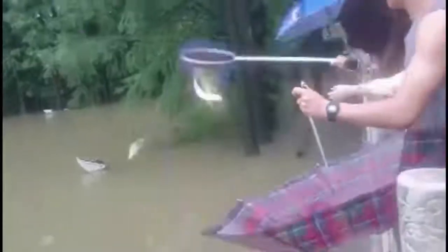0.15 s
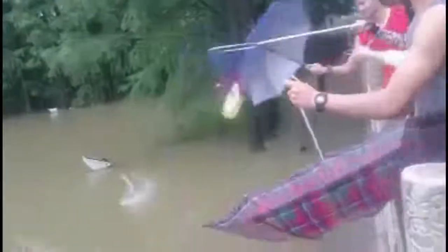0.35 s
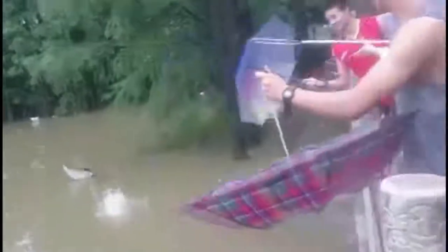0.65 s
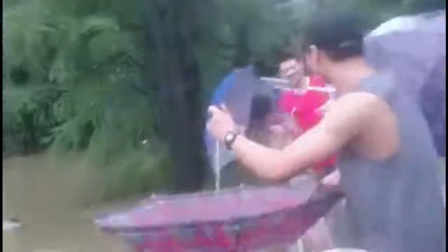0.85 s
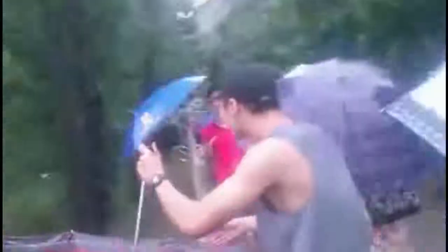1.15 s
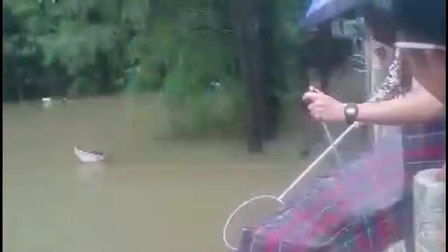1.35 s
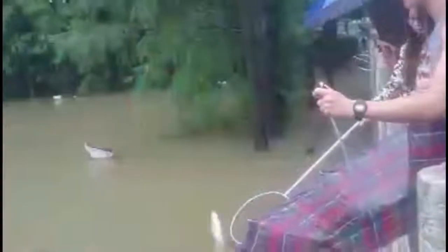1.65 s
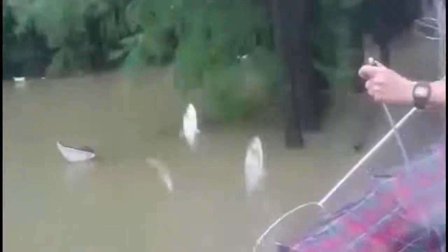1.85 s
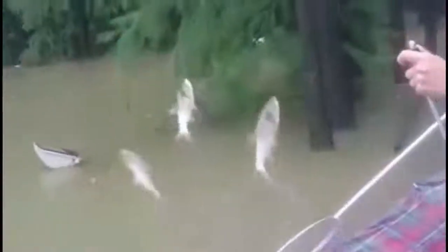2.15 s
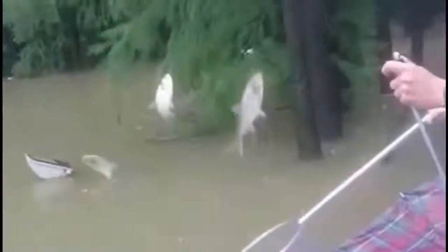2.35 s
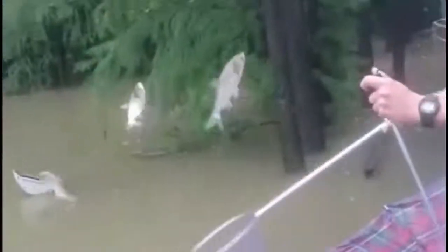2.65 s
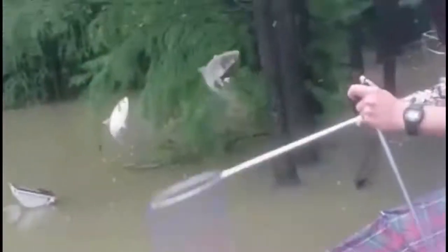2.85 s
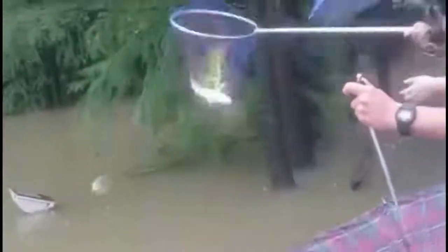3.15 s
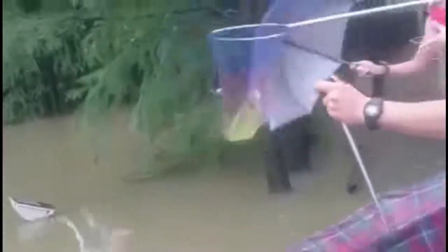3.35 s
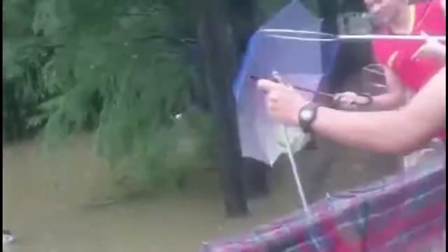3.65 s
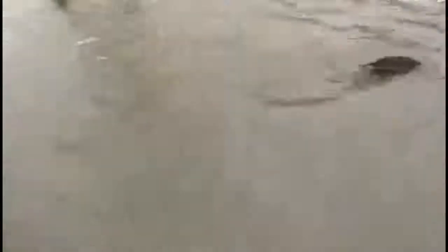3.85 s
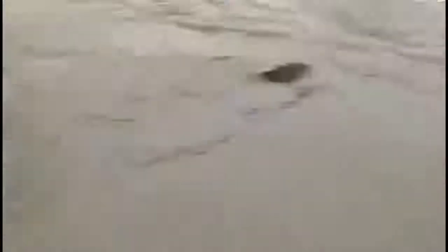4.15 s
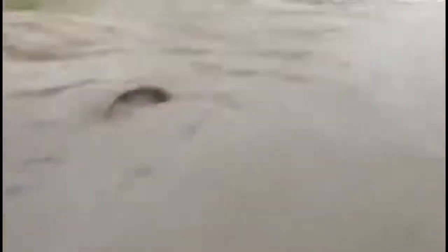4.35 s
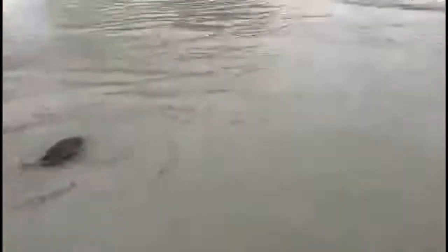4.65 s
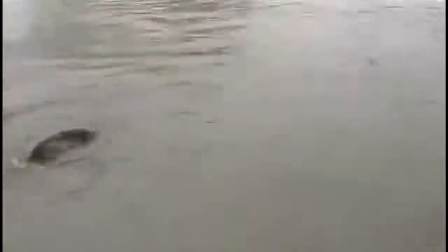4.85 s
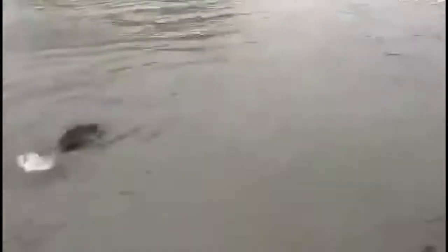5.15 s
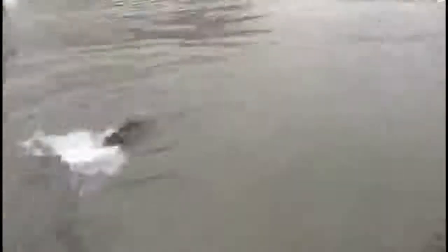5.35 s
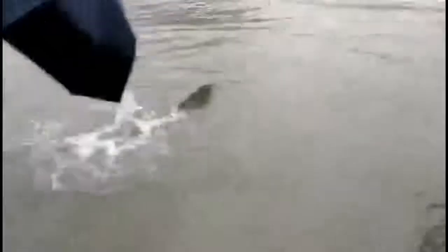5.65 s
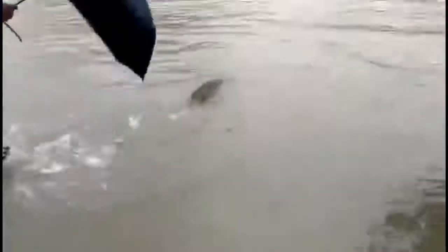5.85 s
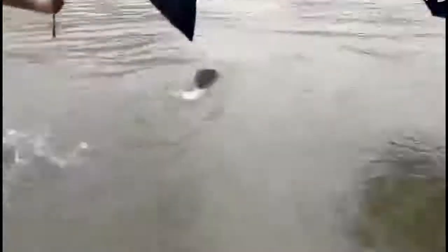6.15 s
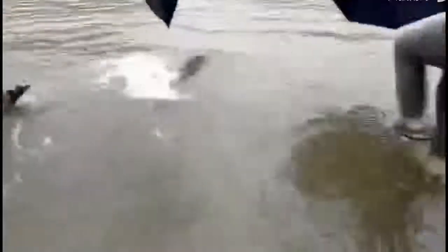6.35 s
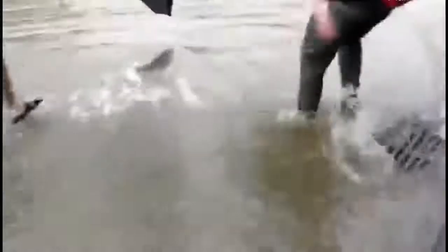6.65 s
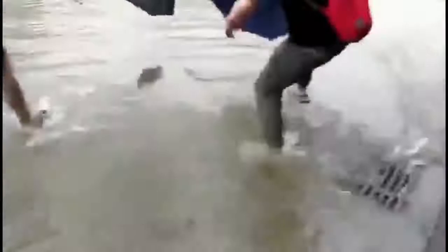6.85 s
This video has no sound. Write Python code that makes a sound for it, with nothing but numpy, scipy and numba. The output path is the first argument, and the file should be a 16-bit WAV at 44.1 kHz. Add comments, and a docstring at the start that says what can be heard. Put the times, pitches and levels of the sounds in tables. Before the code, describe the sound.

Rapid dripping and bubbling plops ring in an echoing hollow, joined after the midpoint by a growing rush of churning water.

```python
"""Drips ring out over a trickle in a hard-walled hollow: damped sines for bubbles, noise snaps for impacts.
Softer-starting bubbles hold or glide in pitch; short weak sines blur each ring into an echo tail.
Swarms of small sines form the trickle, and feedback delays the echo of the hollow.
A broad gush then swells in: flickering noise bands joined by dense bubble and droplet swarms.
Below it lie a rumble that follows the flow and a far, lumpy one; thin hiss and bright sprays lie above."""
import sys
import numpy as np
from scipy import signal
from scipy.fft import rfft, irfft, next_fast_len
from scipy.io import wavfile
from numba import njit

SR = 44100
rng = np.random.default_rng(int(sys.argv[2]) if len(sys.argv) > 2 else 0)


def output_pcm(signal):
    """Save a mono or channel-first signal as 16-bit PCM at the path in sys.argv[1].

    Samples are clipped to [-1, 1] before scaling.
    """
    pcm = np.clip(np.atleast_2d(signal).T, -1, 1) * 32767
    wavfile.write(sys.argv[1], SR, np.round(pcm).astype(np.int16))


N = 308259

# Columns named "left-right/dB" give the level at the left ear minus that at the right.
# Drop impacts: t/s, level/dB (before a common lift), left-right/dB
IMPACTS = [(0.07, -35, 1), (0.197, -27, 8), (0.235, -31, -5), (.5307, -35, 10), (.699, -34, 0),
           (0.767, -36, 4), (0.998, -26, -4), (1.055, -30, -5), (1.191, -34, -12), (1.277, -30, 10),
           (1.435, -30, 7), (1.453, -28, 7), (1.5708, -28, 4), (1.6336, -34, 2), (1.6584, -33, -4),
           (1.79, -32, 4), (1.8842, -29, -8), (1.944, -24, 8), (2.0057, -27, 0), (2.0513, -23.5, 3),
           (2.6157, -23, 8), (2.7464, -29.5, -8), (2.84, -23, 3), (3.2859, -32, 12), (3.49, -34.5, -2),
           (3.5545, -34, -12), (3.7994, -30, -3), (4.0126, -43, -1), (4.274, -22, 6), (4.398, -30.5, -9),
           (4.4353, -27, 8), (4.5704, -31, -16), (4.6253, -32, 14), (4.697, -32, 0), (4.757, -28, 7),
           (5.222, -29, -12), (5.3582, -25.5, 7), (5.723, -33, 2), (5.9638, -35, 5), (6.01, -27, 4),
           (6.385, -38, 0), (6.445, -42, 0), (6.563, -46, -6), (6.6087, -29, 5), (6.645, -41, -4),
           (6.6793, -33, 9), (6.85, -30, 1), (6.861, -32, -4), (6.875, -25, -5)]
# Small bubbles of the trickle: t/s, level/dB
TRICKLE_LEVEL = [(0, -46.5), (.4, -52.5), (.55, -45.5), (1.1, -52.5), (1.25, -43.5), (1.7, -49),
                 (2.0, -45.5), (2.4, -46), (2.68, -46.5), (2.9, -46), (3.05, -48), (3.8, -49), (4.4, -46.5)]
# Flow of the gush: t/s, level/dB
GUSH_FLOW = [(3.87, -46.5), (4.84, -44), (5.12, -46.5), (5.17, -41.5), (5.3, -45), (5.49, -40),
             (5.525, -36.5), (5.56, -40.5), (5.84, -39.5), (5.94, -38), (6.1, -38.5), (6.5, -40),
             (6.63, -36.5), (6.72, -39.5), (6.86, -39.5), (6.99, -40.5)]
# Relative spectral densities of the noises: f/Hz, level/dB (per Hz)
HISS_SPECTRUM = [(180, -64), (300, -20), (968, -9.5), (1890, 3), (2310, -13), (5070, -8), (9910, -21.5),
                 (13800, -18.5), (15300, -32), (16400, -51)]
RUSH_SPECTRUM = [(76, -53), (130, -17.5), (771, -2), (2160, -5), (2490, -1), (3740, -13), (8230, -25.5),
                 (12100, -42), (15100, -44), (16400, -55)]
RUMBLE_SPECTRUM = [(20, 6), (40, -31), (62, -1), (80, 14), (110, -25), (150, -52)]
FAR_RUMBLE_SPECTRUM = [(20, -4), (40, -12.5), (75, -0.5), (110, -9.5), (155, -15.5), (220, -21.5),
                       (300, -21)]
# Correlation between the ears: f/Hz, coefficient [0 to 1]
EAR_CORRELATION = [(60, 0.75), (130, 0.6), (300, 0.35), (500, 0.59), (1600, 0.56), (5000, 0.46),
                   (15000, 0.028)]
# Zero line of the waveform: t/s, offset [full scale = 1]
ZERO_LINE = [(0, .00475), (3.872, .00475), (3.877, .0089), (7, .0089)]
# Fine sprays falling back after a splash: t/s, level/dB, lowest f/Hz, decay time/ms
SPRAY_EVENTS = [(0.072, -47, 3000, 13), (0.531, -44.5, 3500, 23), (.2, -52, 6000, 15),
                (1.845, -58, 5500, 15), (2.048, -41, 9100, 18), (2.63, -46, 3500, 18),
                (3.288, -63, 5500, 11), (1.278, -44, 4000, 11), (1.66, -48, 4500, 18),
                (4.014, -54, 4300, 20), (4.757, -49, 5000, 28), (5.962, -35, 8000, 25)]
# Low pushes under the heaviest drops: t/s, level/dB, f/Hz, fade/ms
HEAVES = [(2.615, -52, 169, 22), (2.8391, -43, 260, 2.3)]
# Bubbles struck by a falling drop: t/s, level/dB, f/Hz, fade/ms, left-right/dB
STRUCK_BUBBLES = [(.0025, -28, 3600, 3.1, 8.5), (0.073, -19.5, 4070, 2.1, 7.5),
                  (0.1593, -21.5, 2020, 6.3, 3.5), (.2, -18, 8040, 1.1, -2), (.2155, -34, 3270, 2.2, -5),
                  (0.216, -28, 8100, 1.4, -0.5), (0.236, -21.5, 2410, 3, -16), (0.2991, -20, 4170, 5.7, -5),
                  (0.354, -31, 6000, 2, 1.5), (0.3605, -27, 3250, 2, -1.5), (0.4474, -22.5, 2570, 3.5, -17),
                  (0.611, -36.5, 6700, 2.5, 6), (0.6999, -19, 3020, 3.2, 16), (0.7008, -35, 4300, 1.1, 18),
                  (.81, -35, 3250, 1.7, 3), (0.8272, -28.5, 2500, 3.3, 17.5), (0.9351, -28, 2060, 1.3, -13),
                  (0.933, -28, 4140, 1.8, -6.5), (0.9994, -27, 1980, 4.3, 19.5),
                  (1.017, -37, 2690, 5.3, 5.5), (1.0427, -30, 2030, 12, 7), (1.057, -21.5, 5700, 1.8, -11),
                  (1.128, -40, 4430, 9, 3), (1.1905, -30.5, 2700, 3.8, -13.5), (1.219, -33, 2720, 9.7, 16),
                  (1.2775, -17.5, 4700, 2, -3), (1.28, -24.5, 3750, 2.8, -2), (1.278, -24.5, 5460, 2.8, -1),
                  (1.4186, -36, 1000, 10, 6), (1.4345, -37, 1002, 21, 0), (1.453, -23, 2900, 1.9, 0),
                  (1.4608, -32, 7500, 1.7, 1.5), (1.467, -35, 1616, 14.5, 26),
                  (1.477, -28.5, 2000, 7.1, -9), (1.486, -23, 3880, 2.4, 10.5),
                  (1.5725, -33, 6430, 1.4, 0.5), (1.589, -31, 2410, 7.1, -3), (1.641, -38, 1580, 9, -4),
                  (1.6585, -24.5, 2940, 3.8, 7), (1.6614, -18, 5600, 2.3, 12.5), (1.76, -45, 6740, 1.3, -4),
                  (1.818, -30, 2080, 4.7, 5), (1.832, -24.5, 3400, 1.8, 1), (1.831, -30, 4430, 1.2, 11),
                  (1.8442, -35, 2000, 6.1, -3), (1.886, -22, 2200, 2, -16.5),
                  (1.9229, -28.5, 4320, 2.2, 10), (1.95, -41, 7000, 3.6, 7.5), (1.996, -29, 4270, 1.4, 3),
                  (2.024, -22, 1810, 2.8, 10), (2.128, -28.5, 3050, 0.71, 1.5), (2.11, -38, 5540, 5.5, 2),
                  (2.1776, -25, 3600, 1.2, 10), (2.217, -27, 1750, 5.7, 5), (2.265, -31, 7100, 0.85, 2),
                  (2.281, -34, 2220, 4.2, -2), (2.309, -18.5, 3050, 1.9, 8), (2.432, -19, 1860, 5.8, 10.5),
                  (2.472, -49, 2550, 7.3, -4), (2.5462, -34, 5100, 2.6, 8), (2.604, -25, 2070, 6.9, 7),
                  (2.618, -17.5, 5800, 0.56, -3), (2.6176, -17.5, 2870, 4.2, -6.5),
                  (2.625, -24, 3630, 6, 7.5), (2.6375, -29, 6260, 1.7, -4.5), (2.726, -29.5, 1960, 6.1, -6),
                  (2.749, -18.5, 3500, 2.1, -13), (2.7487, -28, 4300, 1.8, -8), (2.842, -12, 1894, 4.2, -3),
                  (2.843, -25, 5140, 1, -12), (2.882, -36, 3400, 2, -18), (2.899, -23.5, 1870, 6.4, -9),
                  (3.028, -30.5, 2100, 4.4, 6), (3.167, -31, 1970, 4.4, -6), (3.18, -31.5, 2680, 1.2, 3),
                  (3.286, -28.5, 2850, 1.8, -1), (3.286, -22, 7160, 0.97, 1), (3.342, -24.5, 4670, 2.1, 3),
                  (3.3467, -28.5, 2420, 4.2, 3.5), (3.489, -36, 3550, 2.4, 1),
                  (3.5546, -26, 4800, 3.7, -11), (3.611, -34, 1630, 8.9, 5),
                  (3.6488, -18.5, 1690, 6.4, 9.5), (3.664, -20.5, 3370, 1.2, -4),
                  (3.6656, -29, 4400, 1.2, 8), (3.68, -33, 3020, 5.6, 12), (3.693, -37.5, 2920, 4.6, 33),
                  (3.776, -29, 6200, 3, 1), (3.7766, -27.5, 3020, 1.9, 12), (3.7755, -32, 5230, 1.5, 9),
                  (3.849, -34, 3530, 2.6, 1), (3.913, -36, 4070, 5.1, 14), (4.012, -13.5, 4970, 1.6, 9.5),
                  (4.0132, -20.5, 5760, 1.8, 8.5), (4.0168, -22, 1365, 4.7, 5),
                  (4.153, -23, 4320, 1.6, 3.5), (4.176, -22, 5000, 1.5, 7), (4.1765, -37, 5940, 1.5, 18),
                  (4.194, -33, 2930, 3.5, 11), (4.2758, -22.5, 1720, 5.4, -2), (4.285, -33, 3900, 3.6, 10),
                  (4.304, -29, 2570, 2.1, -2), (4.3974, -15, 2250, 2.4, -7.5), (4.428, -21, 2660, 5.6, 10),
                  (4.4465, -44, 9200, 1.5, 16), (4.571, -37, 2320, 3.6, -17), (4.627, -21.5, 7000, 0.65, 8),
                  (4.757, -25, 3080, 2, 1.5), (4.765, -24, 7300, 1.6, -3), (4.833, -27, 2650, 5.2, 1.5),
                  (4.866, -29.5, 1240, 3.4, 3.5), (4.9464, -20, 2700, 2.3, -7),
                  (4.995, -24.5, 2160, 4.7, 3), (5.031, -27.5, 1420, 4.9, 6), (5.192, -24.5, 934, 2.4, 3),
                  (5.2235, -20, 3820, 2.4, -14), (5.2232, -29, 4460, 1.8, -16), (5.279, -25, 4260, 2.5, 1),
                  (5.36, -15.5, 1780, 6, -4), (5.382, -26, 7530, 4.7, 7), (5.415, -28, 3540, 2.6, 16),
                  (5.516, -29.5, 3790, 3, -11), (5.6145, -26.5, 1620, 7.9, 8), (5.725, -21, 4000, 1.8, 6),
                  (5.726, -31, 735, 5.7, 9), (5.754, -26, 2550, 7.9, -2.5), (5.896, -21, 3290, 1.9, -12),
                  (5.918, -24, 4900, 1.2, -5), (6.0074, -17, 4030, 1.4, -11.5),
                  (6.0082, -22, 5000, 1.7, -3), (6.1173, -13, 2200, 5.8, -3), (6.15, -24, 1980, 2.7, 3),
                  (6.192, -23.5, 5700, 3, -3), (6.1983, -24.5, 900, 4.6, 8), (6.252, -20, 3960, 2.2, -2.5),
                  (6.2517, -21, 2210, 1.9, -18), (6.287, -31, 3670, 4.3, 11), (6.317, -31, 4520, 4.2, 8.5),
                  (6.317, -19.5, 3600, 1.9, 3.5), (6.379, -18.5, 2730, 5.1, -5),
                  (6.611, -23.5, 3010, 3.3, 18), (6.645, -20, 3930, 1.9, 11),
                  (6.6787, -30.5, 7400, 2.7, 8.5), (6.72, -34, 7700, 1.7, 2), (6.7865, -23, 890, 1.2, 9),
                  (6.846, -20, 1156, 1.5, 5), (6.845, -18.5, 2800, 1.8, -5), (6.846, -22, 3870, 1.7, -4),
                  (6.848, -21, 5240, 1.4, 5), (6.873, -27, 4120, 2.1, 13), (6.875, -28, 770, 4.7, 11),
                  (6.9262, -20.5, 2140, 6.6, 2.5)]
# Softer-starting bubbles, steady or gliding in pitch:
# t/s, level/dB, f/Hz, glide/(octaves per s), fade/ms, left-right/dB
SOFT_BUBBLES = [(0.012, -34, 1620, 5, 12, 4), (.053, -38.5, 1930, 2.5, 11, -18),
                (0.0734, -27, 1810, 1, 2.3, -4), (0.169, -36, 2150, 29, 19, 1.5),
                (0.202, -31.5, 1427, 26, 16, 6), (0.258, -37.5, 995, -2.5, 25, -6),
                (.379, -38, 2140, 0, 10, -2), (0.414, -34.5, 2420, 3, 40, 6.5),
                (.454, -38, 1115, 17, 11, 8), (0.536, -33.5, 2480, 46, 7.4, 14.5),
                (.547, -38.5, 1296, 4, 38, 4), (.598, -36, 1546, 24.5, 14, 13.5),
                (0.704, -33.5, 1330, 35, 7.6, -2), (0.7496, -20, 1543, 47, 8.6, 4.5),
                (0.861, -46, 1110, -2.5, 19, -3), (0.8998, -33, 1394, 11.5, 24, 4.5),
                (1.0, -32, 1890, 40, 11.9, 16), (1.162, -37, 1400, -8, 6.9, 0),
                (1.177, -33, 870, 45, 22, 7), (1.2035, -29, 1690, 0, 8, 5), (1.252, -35, 1236, 23, 16, 6),
                (1.267, -36, 1790, 0.5, 41, 3), (1.336, -33.5, 916, 64, 18, 4),
                (1.59, -36, 881, -0.5, 22, -9), (1.6337, -18, 1513, 77.5, 10.2, -3),
                (1.827, -22, 1520, 31, 9.3, -5), (1.874, -37, 1047, 7, 11, -8),
                (1.956, -24.5, 1546, 25.5, 17, 4), (2.0092, -28, 933, -1, 8.7, 6),
                (2.043, -33, 1680, -1, 26, -7), (2.129, -40, 1250, 0.5, 12, 8),
                (2.152, -36, 2880, 2, 18, -3), (2.3134, -31.5, 913, -1.5, 19, -6),
                (2.346, -37, 980, 10, 12, 1), (2.362, -28.5, 1415, -6, 4, 4),
                (2.398, -42.5, 898, 0, 33, 14), (2.5093, -30.5, 1295, 36, 17, -9),
                (2.545, -36, 996, 45, 29, 4), (2.57, -38, 1200, 29, 17, 7),
                (2.707, -43.5, 1000, 8.5, 45, -13), (2.774, -32.5, 1320, 15.5, 22, -5),
                (2.8132, -28, 1610, 30, 7.2, -6), (2.846, -21, 1330, 51, 6.6, -4),
                (3.003, -39, 1730, 2.5, 25, 5), (3.031, -44, 990, -1, 12, 14),
                (3.073, -25, 1466, 41, 11, -3), (3.169, -37.5, 1110, 33, 21, 4),
                (3.1903, -37, 1186, 3.5, 11, 2), (3.447, -30.5, 1670, -1, 7.1, -11),
                (3.4906, -40, 911, -1.5, 47, 10), (3.5265, -43.5, 927, -0.5, 27, 4),
                (3.5902, -24.5, 1405, 44, 8.2, -7.5), (3.624, -33.5, 1740, 10, 21, 3),
                (3.6388, -31, 857, 14, 6.8, 6), (3.743, -38, 3300, 54, 6.1, 10),
                (3.76, -51, 1116, 2, 41, 2), (3.786, -35.5, 1250, 70, 21, 2.5),
                (3.846, -42.5, 1144, 0.5, 38, -3), (3.872, -35.5, 973, 42, 22.6, 6),
                (3.995, -44, 820, 25, 17, 5), (4.112, -34, 1410, 2, 11, -7),
                (4.2252, -36.5, 892, 31, 35, 4), (4.429, -29, 1270, 33, 8.1, 5),
                (4.525, -33, 1690, 4.5, 22, 4), (4.736, -30, 1240, 17, 8.4, 8),
                (5.207, -27.5, 1393, 40, 18, 6.5), (5.518, -23, 730, 6, 3, 7),
                (5.521, -28.5, 1202, 0.5, 14, 0), (5.529, -24, 1710, -27, 5.2, 5),
                (5.576, -18, 1255, 85, 10.2, -3), (5.928, -14, 446, 31, 5.5, -3),
                (6.014, -29.5, 1670, 47, 3.7, 22.5), (6.109, -28, 1500, 53, 2.3, 15),
                (6.122, -21, 1360, 19.5, 16.6, -5), (6.58, -32.5, 1290, 14, 70, 5),
                (6.632, -25, 980, 0, 2.1, 1), (6.6439, -21, 960, -8, 2.3, 9),
                (6.785, -30, 1262, 25.5, 32, 6)]

HISS_DB, FAR_RUMBLE_DB = -49.5, -70.5
LUMP_DB, LUMP_SPLIT_HZ = 14, 95   # depth of the far rumble's lumps, which lie above the split
RUMBLE_DB, RUMBLE_FOLLOWS = -54, 0.92   # level at the final flow; dB per dB of flow
SURGE_DB, SURGES_PER_S, GUSH_CLUMP_DB = 1.2, 20, 1.5   # quick clumps in the gush; in its two swarms
GUSH_START_S, GUSH_OPENING_S = 3.87, 1.23
SHARED_FLICKER = .2   # weight of the flicker common to all noise bands
WAVER, FLUTTER = .013, 22.   # share of pitch; the level wavers this many times as much
CLEAR_ROUGH = 1.7   # clear bubbles waver this many times more
TICK_S, TICK_LIFT_DB, TICK_BAND_HZ = .0006, 3.5, [1810, 10400]
SMALL_CLUMP_DB, SMALL_CLUMPS_PER_S = 3.5, 12.3
TINY_DB, TINY_CLUMP_DB, TINY_CLUMPS_PER_S = -49, 2.5, 8.3
STRUCK_SWELL_MS, STRUCK_GLIDE, SOFT_SWELL_MS = 0.14, -3, 1.87   # glide in octaves per s
SNAP_DB, SNAP_CYCLES, SNAP_OCTAVES = -1, 2.5, .42   # against its bubble; fade; start above its pitch
TAIL_DB, TAIL_OCTAVES, TAIL_CYCLES = -16.5, .5, 5.5   # against its bubble; pitch spread; shortest fade
POOL_LOW_HZ = 640
HOLLOW_T60_S, HOLLOW_DB, WALL_CUT_HZ = 0.11, -14.5, 4600
CUTOFF_HZ = 16600


def from_db(db):
    """Amplitude ratio is ten to the power of dB over twenty."""
    return 10 ** (np.asarray(db) / 20)


def rms_one(x):
    """Dividing by the root mean square normalises to unit power."""
    return x / np.sqrt(np.mean(x ** 2) + 1e-20)


def in_time(rows):
    """Linear interpolation turns each column after t into one value a sample."""
    s, *columns = np.transpose(rows)
    return [np.interp(np.arange(N) / SR, s, c) for c in columns]


def at_hz(points, hz):
    """A spectrum is interpolated linearly over the logarithm of frequency."""
    table = np.array(points)
    return np.interp(np.log(hz), np.log(table[:, 0]), table[:, 1])


def bandpass(x, order, band_hz):
    """A Butterworth band-pass has a maximally flat passband."""
    return signal.sosfilt(signal.butter(order, band_hz, "band", fs=SR, output="sos"), x)


def steep(x, hz, kind):
    """A fifth-order Butterworth high- or low-pass falls 30 dB an octave."""
    return signal.sosfilt(signal.butter(5, hz, kind, fs=SR, output="sos"), x)


def drift(rate):
    """Two equal low-pass poles at rate/Hz smooth white noise into a fluctuation of unit power."""
    step = 40   # samples per control value
    pole = np.exp(-2 * np.pi * rate * step / SR)
    white = rng.standard_normal(N // step + 2002)
    slow = signal.lfilter([1], [1, -2 * pole, pole * pole], white)[2000:]   # settled part
    return np.interp(np.arange(N) / step, np.arange(len(slow)), rms_one(slow))


def banded_noise(spectrum, low_hz, high_hz, patchy_db, flicker):
    """Half-octave noise bands fluctuate apart; mixing mid and side noise sets the ear correlation."""
    out, together = 0, drift(flicker)
    edges = 20 * 2 ** np.arange(0, 10, .5)
    edges = edges[(edges >= low_hz) & (edges <= high_hz)]
    white = rng.standard_normal((2, 2, N))
    for k, (low, high) in enumerate(zip(edges, edges[1:])):
        mid, side = bandpass(white[k % 2], 2, [low, high])
        hz = np.sqrt(low * high)
        alike = np.clip(at_hz(EAR_CORRELATION, hz), 0, 1)
        fluctuation = SHARED_FLICKER * together + drift(flicker)
        gain = from_db(at_hz(spectrum, hz) + patchy_db * fluctuation)
        out = out + gain * (np.sqrt(1 + alike) * mid + np.sqrt(1 - alike) * side * [[1], [-1]])
    return rms_one(out)


@njit
def sing(rows, waver, flutter, fade_db, lag_per_db, sr):
    """A bubble is a damped oscillator, free to glide; the far ear may lag by lag_per_db samples per dB."""
    n = len(waver)
    out = np.zeros((2, n))
    for s, db, hz, glide, swell, fade, pan in rows:
        swell, fade = max(swell, .05) * sr / 1000, max(fade, .2) * sr / 1000   # ms to samples
        onset = int(s * sr)
        for ear in range(2):
            side = pan if ear == 0 else -pan
            start = int(s * sr + max(0., -side) * lag_per_db)
            gain, phase = 10 ** ((db + side / 2) / 20), 0.
            for i in range(min(int(swell + 2.5 * fade), n - start)):
                octaves = glide * min(i, swell + fade) / sr
                pitch = hz * 2 ** octaves * (1 + waver[onset + i - 1])
                phase += 2 * np.pi * min(pitch, .4 * sr) / sr
                age = (i - swell) / fade
                # fade_db down after one fade time, then ever faster
                shape = i / swell if i < swell else 10 ** (-fade_db * age * max(age, 1.) / 20)
                # the same waver, read backwards, moves the level
                level = 1 + flutter * min(max(age, 0.), 1.) * waver[n - 1 - onset - i]
                out[ear, start + i] += gain * shape * level * np.sin(phase)
    return out


def swarm(count, low_hz, high_hz, cycles, spread_db, climb, pan_db):
    """Independent oscillators at random moments, log-spread in pitch and a few much louder, sum to unit power."""
    when, size, loud, life, up, where = rng.random((count, 6)).T
    hz = low_hz * (high_hz / low_hz) ** size
    fade = 1000 * cycles / hz * (0.5 + 1.116 * life)
    level_db = -spread_db * np.log(loud + .03)
    glide = climb * up ** 3 * 1000 / fade
    rows = np.c_[when * N / SR, level_db, hz, glide, .3 * fade * life, fade, pan_db * (2 * where - 1)]
    return rms_one(sing(rows, WAVER * drift(163.0), FLUTTER, 3.1, 1., SR))


def far_rumble():
    """Amplitude modulation of the band above the split breaks low noise into lumps with gaps between."""
    noise = banded_noise(FAR_RUMBLE_SPECTRUM, 19, 330, patchy_db=4.0, flicker=12.0)
    far = from_db(FAR_RUMBLE_DB) * steep(noise, 440, "low")
    ear_lift_db = [[6], [1]]
    lumps = from_db(LUMP_DB * np.minimum(drift(8.0), .2) + ear_lift_db)
    return steep(far, LUMP_SPLIT_HZ, "low") + lumps * steep(far, LUMP_SPLIT_HZ, "high")


def hiss():
    """Band-shaped noise of independent flicker in each band makes a thin, restless hiss."""
    noise = banded_noise(HISS_SPECTRUM, 300, 21000, patchy_db=2.5, flicker=20.0)
    return from_db(HISS_DB) * steep(noise, 410, "high")


def hollow(x):
    """Recirculating delays, eight an ear, decay exponentially and lose treble on every round."""
    size = next_fast_len(N + SR)
    w = 2 * np.pi * np.arange(size // 2 + 1) / size
    dull = 1 / (1 + 1j * w * SR / (2 * np.pi * WALL_CUT_HZ))   # treble loss over 0.33 s of echo
    lags = rng.uniform(0.0037, .021, (2, 8)) * SR
    echo = np.zeros((2, len(w)), complex)
    for ear in range(2):
        for k, lag in enumerate(lags[ear]):
            round_gain = from_db(-60 * lag / SR / HOLLOW_T60_S)
            loop = round_gain * np.exp(-1j * w * lag) * dull ** (lag / SR / 0.33)
            echo[ear] += (-1) ** k * loop / (1 - loop)
    return irfft(echo * rfft(x.mean(0), size), size)[:, :N]


def rumble(flow_db):
    """Low-passed noise follows the flow in level, nearly dB for dB."""
    noise = banded_noise(RUMBLE_SPECTRUM, 19, 170, patchy_db=1.5, flicker=1.8)
    level_db = RUMBLE_DB + RUMBLE_FOLLOWS * (flow_db - flow_db[-1])
    return from_db(level_db) * steep(noise, 114, "low")


def gush(flow_db):
    """Turbulent flow is a sum of broadband noise, churning bubbles and short bursting droplets."""
    churn = swarm(count=8000, low_hz=697.0, high_hz=4470, cycles=5.97, spread_db=4.5, climb=0.54, pan_db=11.5)
    crackle = swarm(count=8000, low_hz=1200, high_hz=5500, cycles=2.7, spread_db=3.0, climb=0., pan_db=12.0)
    rush = steep(banded_noise(RUSH_SPECTRUM, 110, 21000, patchy_db=2.0, flicker=48.0), 187, "high")
    churn = from_db(GUSH_CLUMP_DB * drift(19.0)) * churn
    crackle = from_db(GUSH_CLUMP_DB * drift(27.0)) * crackle
    flow = from_db(flow_db + SURGE_DB * drift(SURGES_PER_S))
    return flow * (from_db(5.5) * rush + churn + crackle)


def sprays():
    """Band-passed droplet noise with a rapid onset decays exponentially."""
    out, t = np.zeros((2, N)), np.arange(4000) / SR
    for (s, db, hz, dying), noise in zip(SPRAY_EVENTS, rng.standard_normal((len(SPRAY_EVENTS), 2, 4000))):
        mist = bandpass(noise, 4, [hz, 13500])
        envelope = (1 - np.exp(-t / 0.00047)) * np.exp(-1000 * t / dying)
        at = round(s * SR)
        out[:, at:at + 4000] += from_db(db) * rms_one(mist) * envelope
    return out


def thumps():
    """A heavily damped low oscillation: the water mass heaves once under a heavy drop."""
    rows = np.array([(s, db, hz, 0, .5, fade, 0) for s, db, hz, fade in HEAVES], float)
    return sing(rows, np.zeros(N), 0., 20.0, 0., SR)


def trickle():
    """Many overlapping small bubbles fuse into a clumpy texture over a finer one."""
    small = swarm(count=5000, low_hz=900, high_hz=2800, cycles=11.5, spread_db=3.8, climb=0.7, pan_db=13.5)
    tiny = swarm(count=10000, low_hz=2200, high_hz=7000, cycles=7.0, spread_db=2.8, climb=0.1, pan_db=12.0)
    small_db = in_time(TRICKLE_LEVEL)[0] + SMALL_CLUMP_DB * drift(SMALL_CLUMPS_PER_S)
    tiny_db = TINY_DB + TINY_CLUMP_DB * drift(TINY_CLUMPS_PER_S)
    return from_db(small_db) * small + from_db(tiny_db) * tiny


def ticks():
    """Impact on the surface is an impulsive noise burst about a millisecond long, partly alike at the ears."""
    out, t = np.zeros((2, N + 300)), np.arange(300) / SR
    for (s, db, pan), (shared, *own) in zip(IMPACTS, rng.standard_normal((len(IMPACTS), 3, 300))):
        burst = (shared + 2.1 * np.array(own)) * np.exp(-t / TICK_S)
        snap = bandpass(burst, 1, TICK_BAND_HZ)
        gain = from_db(db + TICK_LIFT_DB + np.array([[pan / 2], [-pan / 2]]))
        at = round(s * SR)
        out[:, at:at + 300] += gain * snap / abs(snap).max()
    return out[:, :N]


def clear_bubbles():
    """Trapped air rings at its own pitch, born with a falling snap and trailed by a blurred echo tail near it."""
    struck = [(s, db, hz, STRUCK_GLIDE, STRUCK_SWELL_MS, fade, pan) for s, db, hz, fade, pan in STRUCK_BUBBLES]
    soft = [(s, db, hz, glide, SOFT_SWELL_MS, fade, pan) for s, db, hz, glide, fade, pan in SOFT_BUBBLES]
    bubbles = np.array(struck + soft, float)
    s, db, hz, glide, swell, fade, pan = bubbles.T

    snap_db = db + SNAP_DB - 4 * swell   # a slower swell has a weaker snap
    snap_glide = -SNAP_OCTAVES * hz / SNAP_CYCLES
    snaps = np.c_[s, snap_db, hz * 2 ** SNAP_OCTAVES, snap_glide, 500 / hz, 1000 * SNAP_CYCLES / hz, pan]

    late, size, loud, life, where = rng.random((len(bubbles), 26, 5)).T   # 26 weak short sines a tail
    late = 0.0036 + 0.045 * late ** 1.9   # s
    tail_hz = hz * 2 ** (TAIL_OCTAVES * (size - .45))
    tail_db = db + TAIL_DB - 200 * late - 6 * loud   # later ones are weaker
    tail_fade = TAIL_CYCLES * 1000 * (1 + life) / tail_hz
    tail_pan = 0.54 * pan + 12 * (where - .5)
    tails = np.array([s + late, tail_db, tail_hz, 8 * life ** 3, 0.093 + 0 * late, tail_fade, tail_pan])
    rows = np.vstack([bubbles, snaps, tails.reshape(7, -1).T])
    return sing(rows, CLEAR_ROUGH * WAVER * drift(154.0), FLUTTER, 6.4, 0.88, SR)


def scene():
    """Superposition: sound pressures of the background, the gush and the echoing pool add."""
    flow_db, = in_time(GUSH_FLOW)
    # the gush and its rumble come in from nothing
    opening = np.clip((np.arange(N) / SR - GUSH_START_S) / GUSH_OPENING_S, 0, 1)
    background = far_rumble() + hiss()
    flowing = opening * (rumble(flow_db) + gush(flow_db))
    splashes = sprays() + thumps()
    # a shallow pool radiates little bass
    pool = steep(trickle() + ticks() + clear_bubbles(), POOL_LOW_HZ, "high")
    return background + flowing + splashes + pool + from_db(HOLLOW_DB) * hollow(pool)


def record(dry):
    """A Chebyshev low-pass cuts the top steeply; the zero line sits off centre and steps up once."""
    low_passed = signal.sosfilt(signal.cheby2(12, 70, CUTOFF_HZ, fs=SR, output="sos"), dry)
    return low_passed + in_time(ZERO_LINE)[0]


dry = scene()
out = record(dry)
output_pcm(out)
```